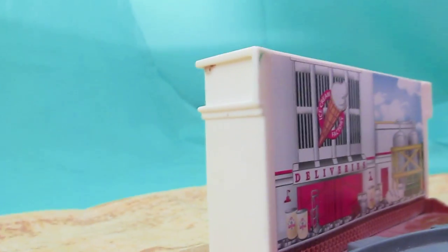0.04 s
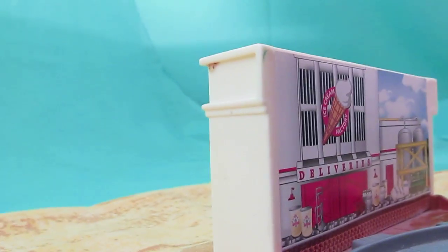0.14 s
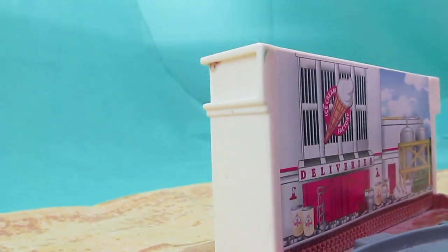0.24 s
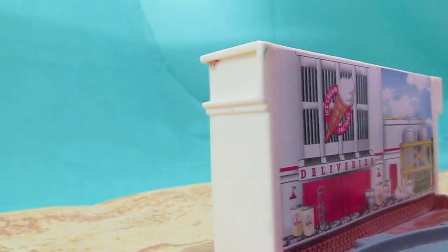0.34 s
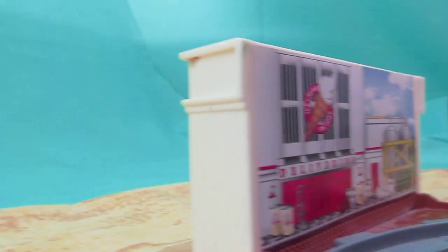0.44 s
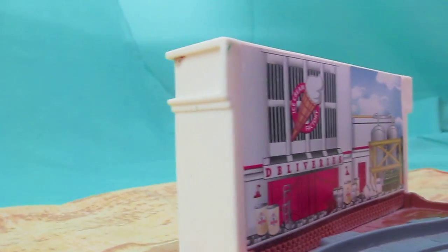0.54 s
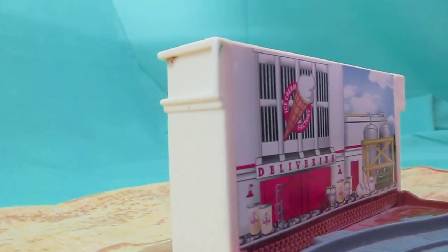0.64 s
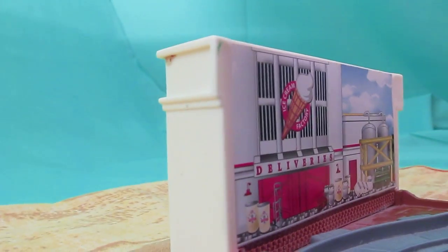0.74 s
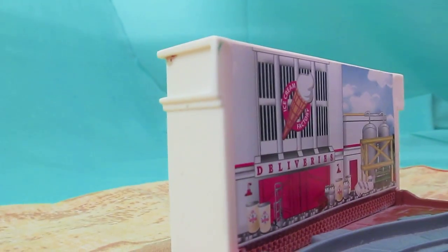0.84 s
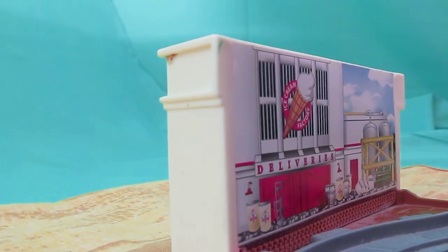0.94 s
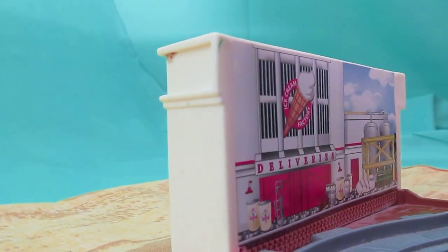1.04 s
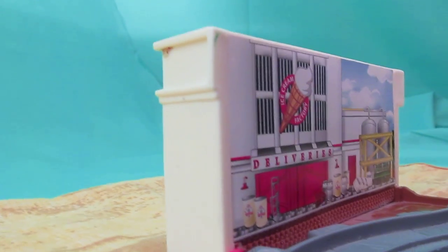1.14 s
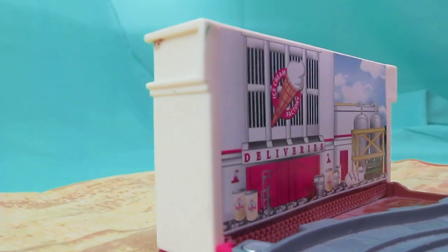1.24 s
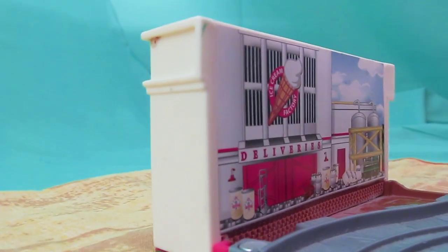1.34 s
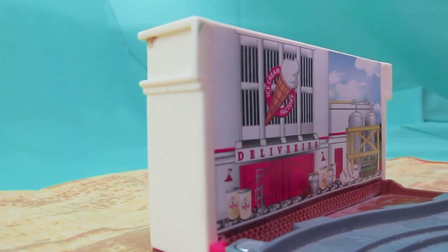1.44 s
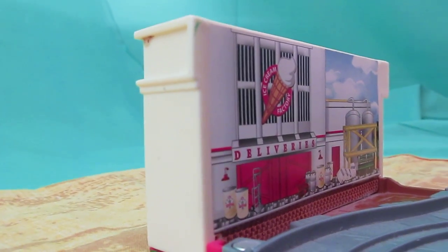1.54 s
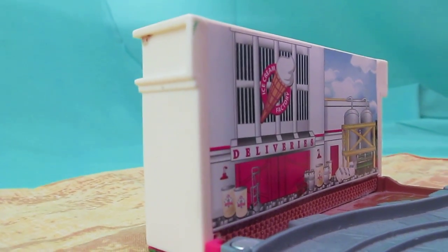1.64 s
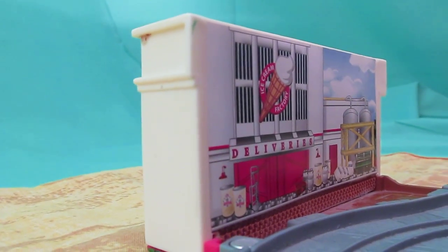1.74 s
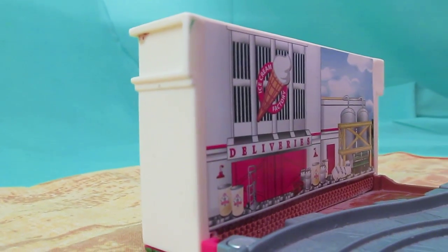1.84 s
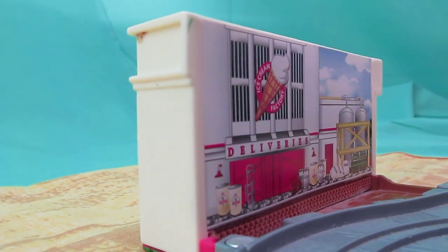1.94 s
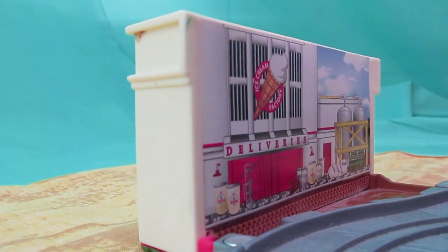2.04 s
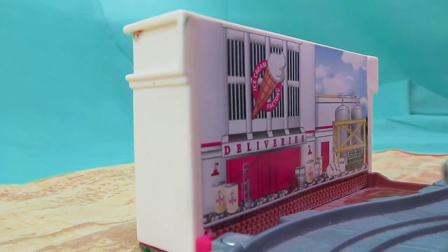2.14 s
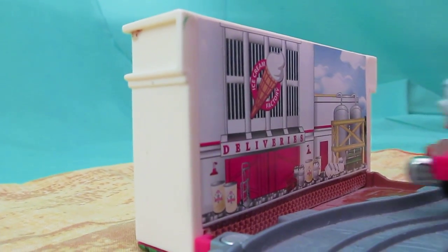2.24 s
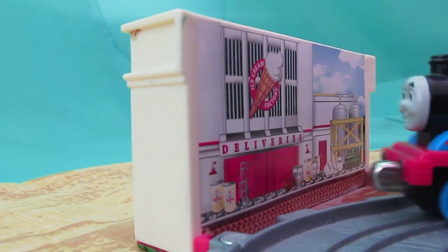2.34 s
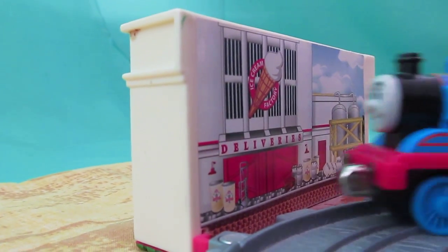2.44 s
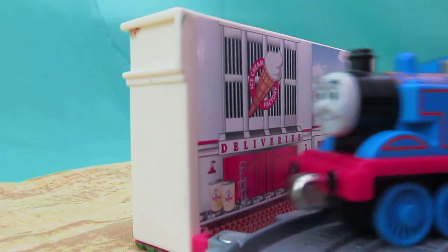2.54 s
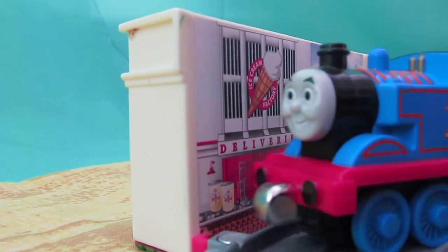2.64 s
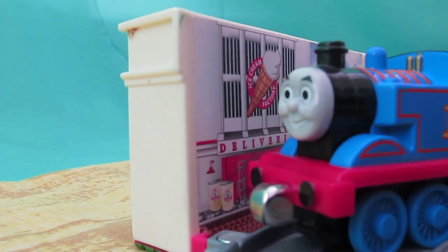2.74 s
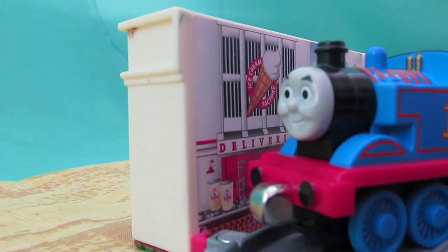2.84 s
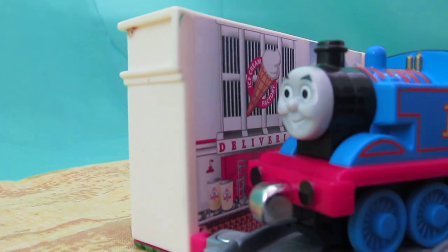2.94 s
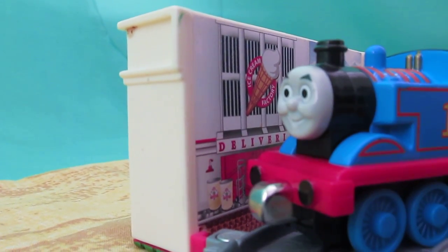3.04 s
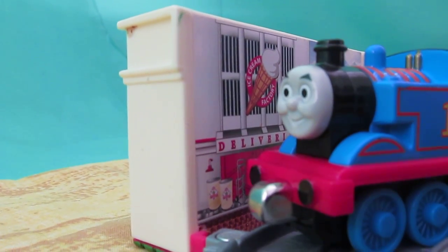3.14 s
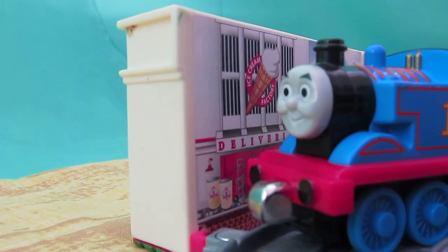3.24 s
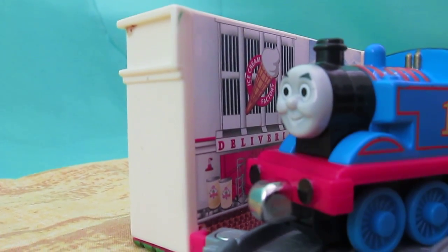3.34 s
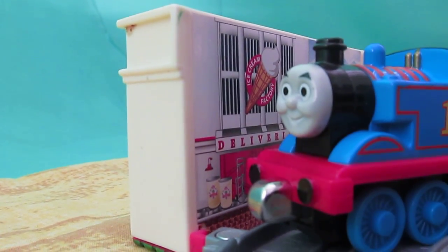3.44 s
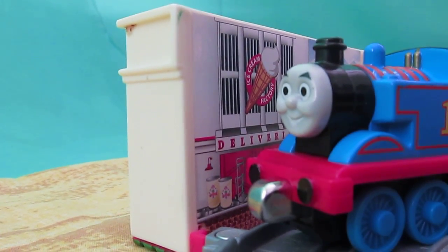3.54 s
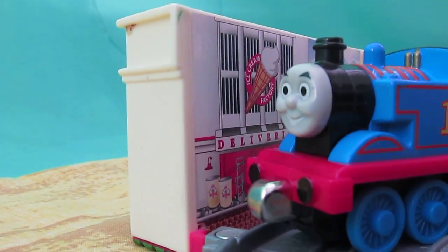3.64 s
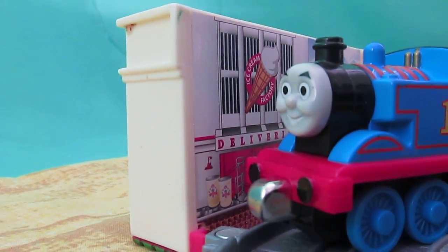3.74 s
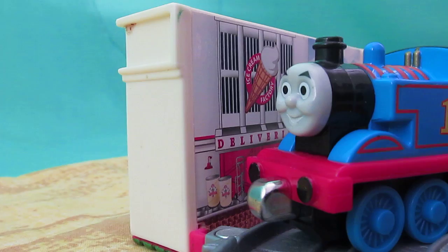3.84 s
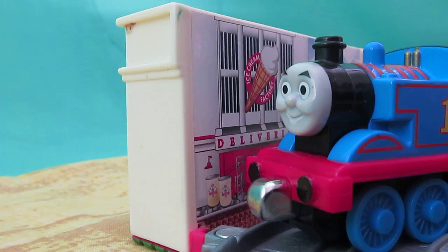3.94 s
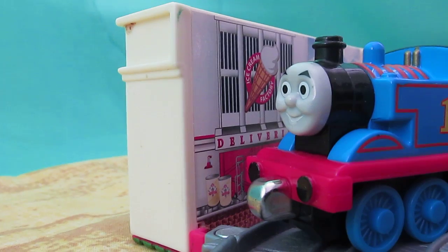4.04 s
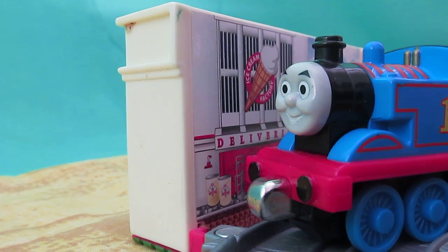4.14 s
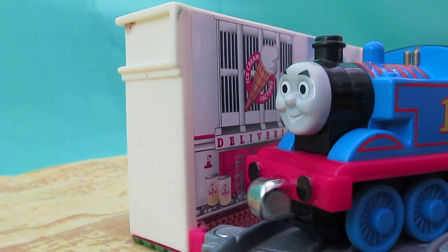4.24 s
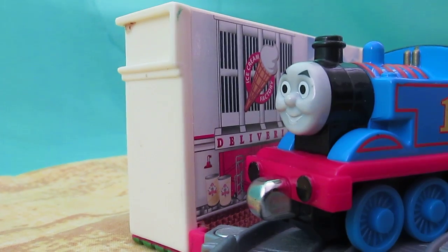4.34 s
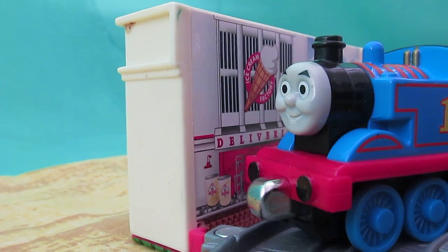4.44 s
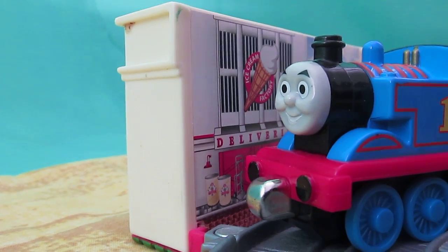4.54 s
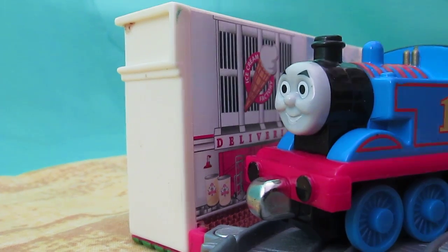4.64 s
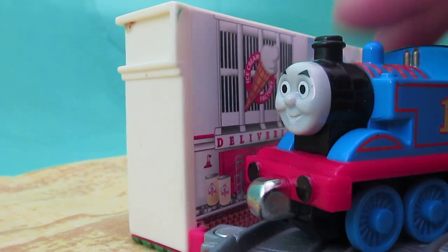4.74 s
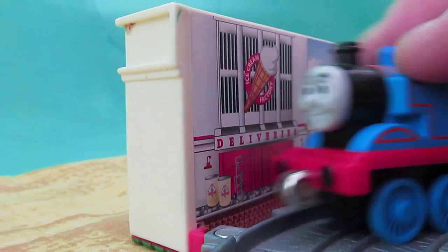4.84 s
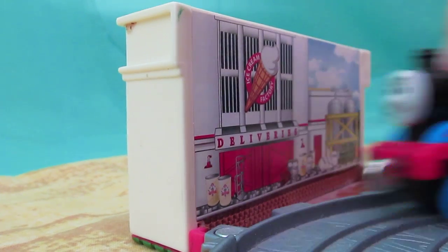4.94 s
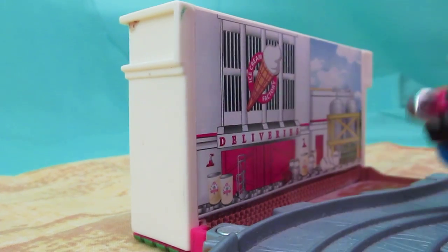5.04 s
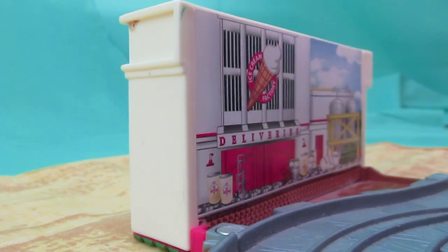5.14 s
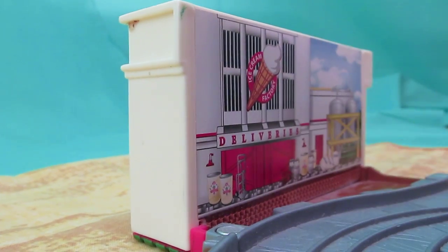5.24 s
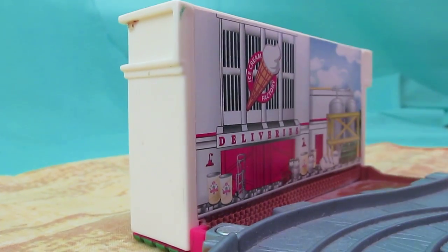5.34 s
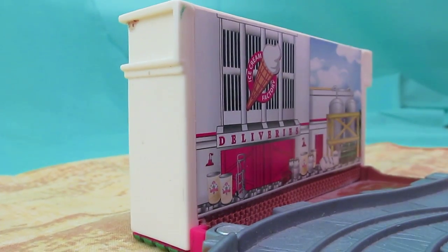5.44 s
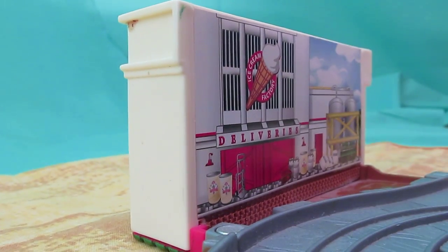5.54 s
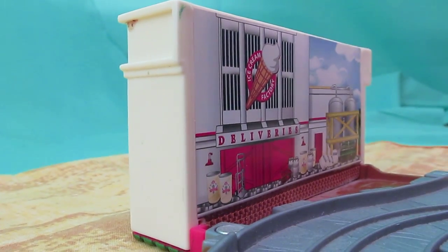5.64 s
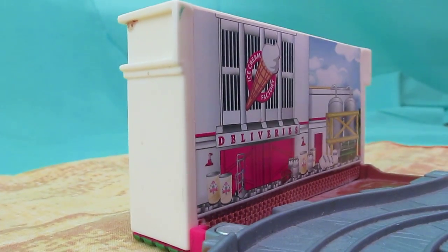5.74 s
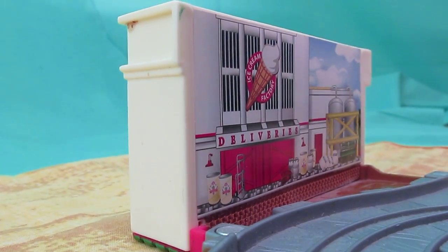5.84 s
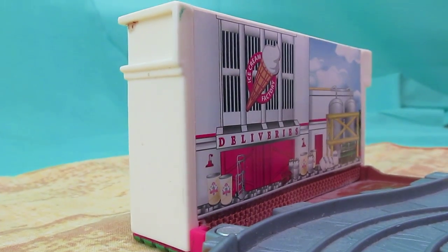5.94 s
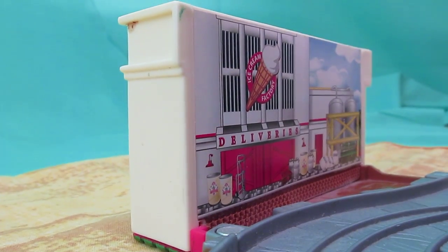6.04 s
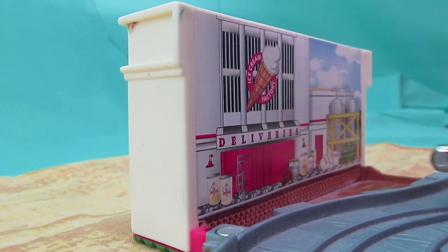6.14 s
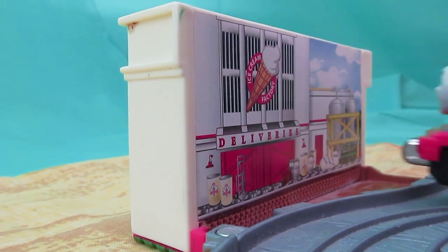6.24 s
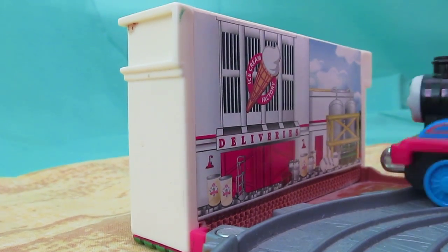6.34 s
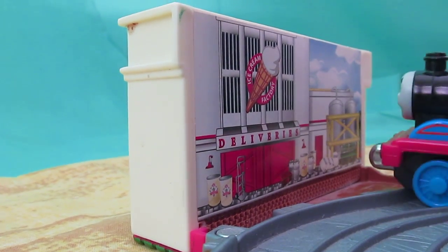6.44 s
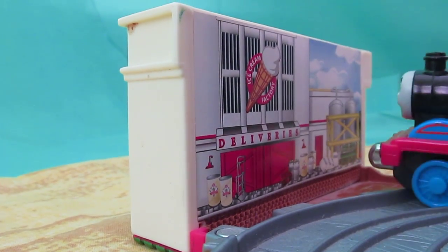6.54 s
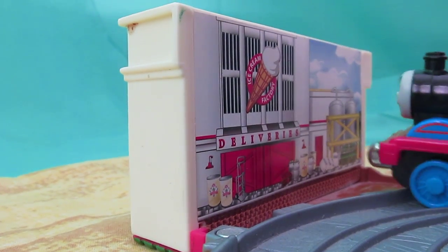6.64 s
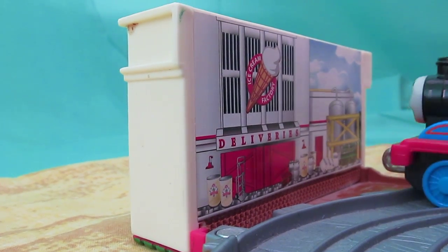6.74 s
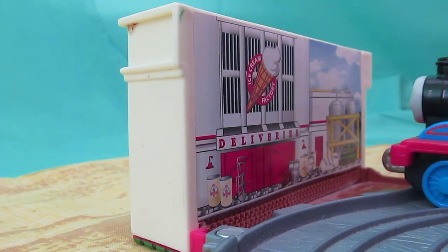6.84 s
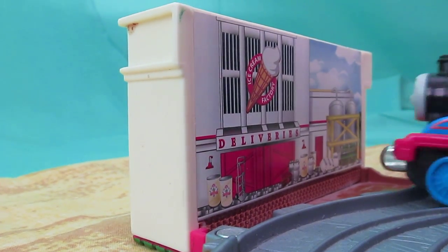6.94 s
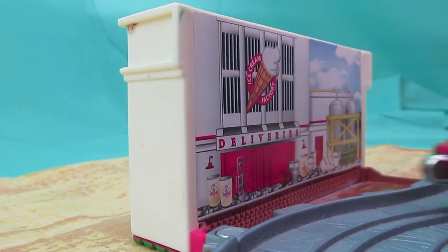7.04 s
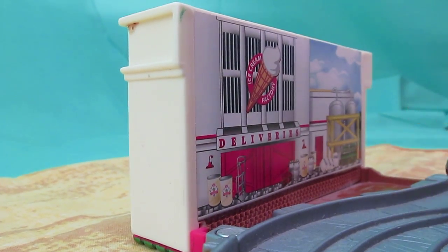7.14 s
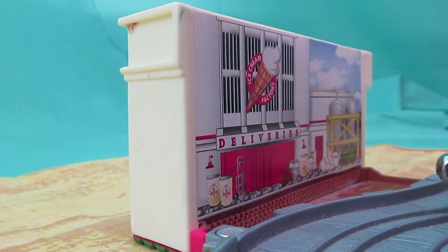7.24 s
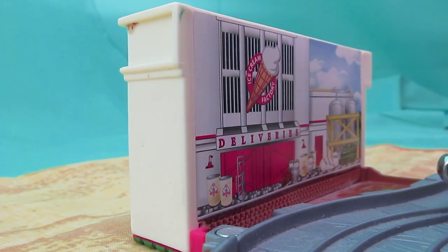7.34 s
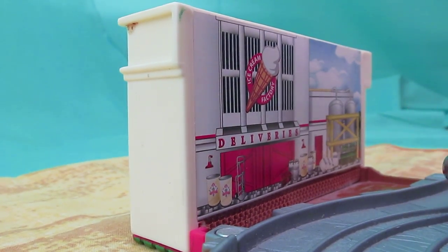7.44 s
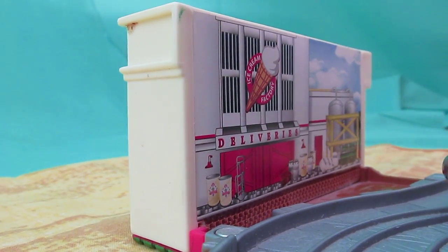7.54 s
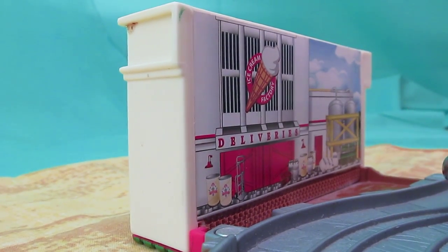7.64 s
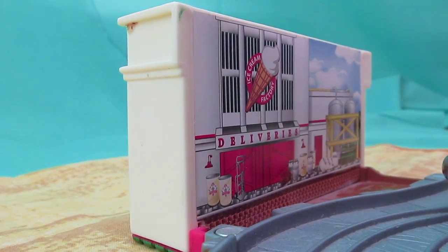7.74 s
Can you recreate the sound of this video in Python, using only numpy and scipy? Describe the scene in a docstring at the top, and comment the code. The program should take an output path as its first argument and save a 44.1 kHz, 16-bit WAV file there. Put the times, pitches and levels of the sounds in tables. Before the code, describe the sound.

Close plastic clicks and rattles come in spurts as a toy engine rolls back and forth by hand, with faint room hum.

```python
"""A small plastic toy engine, pushed to and fro by hand over a moulded track, indoors.
It runs close to a stereo microphone, a little right of centre. Wheels and couplings knock at the joints
and chatter while rolling; each contact rings the hollow plastic, and sharp snaps jingle the metal axles.
A soft breath-like rustle comes early, then faint rubs. The room gives a short, dull echo. Under it all
lie mains hum, a faint whine and air noise, which sink under the loudest knocks and creep back."""
import sys
import numpy as np
from scipy import signal
from scipy.fft import rfft, irfft
from scipy.io import wavfile

SR = 44100
rng = np.random.default_rng(int(sys.argv[2]) if len(sys.argv) > 2 else 0)


def bounce(signal):
    """Save signal as a 16-bit WAV file at the path given by the first command-line argument."""
    frames = np.transpose(np.atleast_2d(signal))
    limited = np.clip(frames, -1, 1)
    pcm = np.round(limited * 32767).astype(np.int16)
    wavfile.write(sys.argv[1], SR, pcm)


N = 343098

# modes of the hollow toy and track: (frequency [Hz], level [dB], t60 [s])
PLASTIC_MODES = [(80, -10, .06), (140, -3, .05), (230, -2, .03), (330, -3, .022), (420, -2, .02),
                 (560, -1, .018), (760, 1, .014), (1070, 3, .012), (1280, -1, .008), (1500, -2, .007),
                 (1940, 0, .007), (2330, 0, .006), (2700, 0, .006), (3150, 0, .006), (3550, -2, .005),
                 (4060, 0, .005), (4700, 0, .005), (5600, -2, .006), (6150, -3, .006), (6700, -2, .009),
                 (7500, -7, .004), (8800, -8, .0025), (10300, -7, .002), (11800, -11, .002),
                 (13600, -16, .0015)]
THUD_TOP_HZ, SNAP_FROM_HZ = 900, 5000   # modes below the first thud, modes above the second snap
TOY_PAN_DB, PAN_SCATTER_DB = -4, 4.5   # left minus right; each contact leaves from another spot


def from_db(db):
    """Gain of a level."""
    return 10 ** (np.asarray(db) / 20)


def in_time(rows):
    """The columns of a (time [s], values...) curve at every sample."""
    times, *columns = np.transpose(rows)
    return [np.interp(np.arange(N) / SR, times, column) for column in columns]


def at_hz(points, hz):
    """A (frequency [Hz], value) curve read on a log-frequency axis."""
    point_hz, values = np.transpose(points)
    return np.interp(np.log(hz), np.log(point_hz), values)


def sides(pan_db):
    """Left and right gain; a positive pan leans left."""
    return from_db(np.outer([.5, -.5], pan_db))


def drift(rate_hz):
    """A slow random wander with a spread of 1."""
    step, settle = 40, 2000
    pole = np.exp(-2 * np.pi * step * rate_hz / SR)
    noise = rng.standard_normal(N // step + settle + 2)
    slow = signal.lfilter([1], [1, -2 * pole, pole * pole], noise)[settle:]
    return np.interp(np.arange(N) / step, np.arange(len(slow)), slow / slow.std())


def air_noise(level_db=-56):
    """Air and microphone noise with a few peaks and dips; the lows are most alike on both sides."""
    # noise floor: (frequency [Hz], relative density [dB])
    floor = [(12, -41), (20, -20), (64, -4.5), (93, -7.5), (122, -3.5), (153, -16.5), (252, -11),
             (417, -19.5), (453, -18), (566, -20), (989, -24), (1780, -29.5), (1980, -30), (8940, -44),
             (15600, -59.5)]
    # low peaks, and a dip in the air noise around the 120 Hz hum: (frequency [Hz], width [Hz], gain [dB])
    peaks_and_dip = [(69, 31, 2), (87, 5.5, 6), (118.6, 24, -10), (232, 11, 1), (262, 4.9, 2),
                     (462.3, 12, 6)]
    # treble notches: (frequency [Hz], width [Hz], gain [dB])
    notches = [(5950, 150, -7), (7870, 90, -12)]
    # likeness of left and right: (frequency [Hz], correlation [0-1])
    likeness = [(60, 0.86), (150, 0.64), (380, 0.87), (950, 0.071), (2380, 0.29), (5980, 0.12),
                (15000, 0.051)]
    hz = np.fft.rfftfreq(N, 1 / SR) + 1e-3
    colour_db = sum(db / (1 + (2 * (hz - f) / width) ** 2) for f, width, db in peaks_and_dip + notches)
    shape = from_db(at_hz(floor, hz) + colour_db)
    shape /= np.sqrt(np.sum(shape[hz > 140] ** 2) / len(hz))   # unit power above 140 Hz
    alike = at_hz(likeness, hz)
    mid, side = rfft(rng.standard_normal((2, N)))
    stereo = np.sqrt(1 + alike) * mid + np.sqrt(1 - alike) * side * [[1], [-1]]
    return from_db(level_db) * irfft(shape * stereo, N)


def hum_and_whine():
    """Mains hum and a faint whine, just left of centre, each wavering slightly in level."""
    # the two sine tones: (frequency [Hz], level [dB])
    tones = [(120, -52.5), (3933.5, -83.5)]
    t = np.arange(N) / SR
    sines = sum(from_db(db + .7 * drift(3)) * np.sin(2 * np.pi * hz * t) for hz, db in tones)
    return np.sqrt(2) * sines * sides([1.1])


def room_tone():
    """Air, hum and whine together; their level dips around the loudest knocks and creeps back."""
    # rise and fall of the room tone: (time [s], level [dB])
    level_curve = [(0, 1), (1, 1), (2.3, 1), (2.7, 0), (3.2, 1), (4.8, 1.5), (5.0, -15), (5.2, -10),
                   (5.5, -9), (5.8, -9), (6.1, -3), (6.35, -6.5), (6.55, -4), (6.9, -2), (7.05, -9.5),
                   (7.3, -5), (7.78, -1.5)]
    return from_db(in_time(level_curve)[0]) * (air_noise() + hum_and_whine())


def strike(at, ring_db, pitch_hz, thud_db, thud_hz, snap_db, pan_db, scatter_db, focus_db_per_oct=16):
    """Contacts as clicks per mode and side: a ring near their pitch, a thud below it, a snap above."""
    luck = rng.standard_normal((len(at), len(PLASTIC_MODES), 4))   # sign, level, left and right phase
    clicks = np.zeros((len(PLASTIC_MODES), 2, N), np.float32)
    for k, (hz, mode_db, _) in enumerate(PLASTIC_MODES):
        near_db = ring_db - focus_db_per_oct * np.abs(np.log2(hz / pitch_hz))
        below_thud_oct = np.log2(thud_hz / hz)
        low_db = thud_db - 5.44 * np.abs(below_thud_oct) - 4.5 * np.maximum(below_thud_oct, 0)
        high_db = snap_db - 14 * np.log2(SNAP_FROM_HZ / hz)
        if hz < THUD_TOP_HZ:
            drive_db = low_db
        elif hz > SNAP_FROM_HZ:
            drive_db = snap_db
        else:
            drive_db = np.max([near_db, low_db, high_db], axis=0)
        size = np.sign(luck[:, k, 0]) * from_db(mode_db + drive_db + scatter_db * luck[:, k, 1])
        # short waves leave from scattered spots and deep thuds shake each microphone port on its own
        spread_rad = max(hz / 9000, 90 / hz)
        for port, gain in enumerate(sides(pan_db)):
            shift = np.round(luck[:, k, 2 + port] * spread_rad * SR / (2 * np.pi * hz)).astype(int)
            np.add.at(clicks[k, port], at + shift, size * gain)
    return clicks


def knocks(slips=8, skid_s=.009, skid_fade_db=16):
    """Single clear knocks of wheels, couplings and fingers, each with a fading skid of bright slips."""
    # (time [s], level [dB], ring pitch [Hz], relative thud [dB], thud pitch [Hz], relative snap [dB])
    contacts = [(0.2463, -36, 1960, -19, 248, -7), (0.673, -23.5, 1710, -8.5, 313, -17.5),
                (0.7599, -38, 1930, -14, 248, -25.5), (1.928, -39, 4000, -23, 250, -9.5),
                (2.1194, -37, 1601, -24, 202, -14), (2.1635, -37, 1790, -5, 202, -29),
                (2.171, -36, 1600, -6, 301, -33), (2.1924, -29.5, 1970, -21, 361, -36),
                (2.206, -28, 2150, -8.5, 245, -18), (2.2234, -39.5, 2300, -3, 202, -5),
                (2.2297, -31, 2510, -10, 320, -19), (2.2582, -17, 1980, -19, 304, -26.5),
                (2.2747, -10, 2020, -34, 202, -15.5), (2.2789, -6, 3350, -31, 226, -14.5),
                (2.2909, -18, 2670, -21, 202, -24), (2.3057, -16, 1990, -23, 307, -28),
                (2.3347, -21.5, 2810, -22, 579, -25), (2.3578, -20.5, 2620, -20, 296, -17),
                (2.3753, -25.5, 2470, -18, 350, -9.5), (2.4145, -20, 2070, -25, 665, -27),
                (2.4265, -15.5, 2550, -24, 668, -27), (2.4404, -19, 2169, -17, 369, -34),
                (2.4722, -19.5, 1870, -18, 288, -16.5), (2.5042, -24, 2500, -21, 202, -29),
                (2.5254, -17, 2670, -19, 546, -25), (2.5322, -15, 2800, -15, 202, -32),
                (2.5389, -16.5, 2060, -6.5, 241, -11.5), (2.55, -8.5, 2530, -31, 310, -24),
                (2.579, -19, 2830, -22, 242, -31), (2.5831, -17.5, 2500, -19, 245, -16.5),
                (2.5984, -25, 2860, -17, 223, -33), (2.656, -39, 1760, -7, 202, -18),
                (3.682, -39, 2000, -11, 223, -20), (4.7564, -19.5, 2550, -13.5, 202, -15.5),
                (4.795, -14, 3120, -17, 230, -40), (4.816, -23, 2520, -13, 207, -26),
                (4.828, -20.5, 2360, -15.5, 202, -31), (4.8504, -20, 2549, -9, 205, -35),
                (4.8589, -17, 2310, -18, 240, -27), (4.8728, -4.5, 2680, -25, 285, -19),
                (4.8835, -14.5, 2420, -11.5, 620, -23), (4.898, -12, 2540, -17, 202, -28),
                (4.9124, -16, 2950, -15, 283, -18), (4.9234, -9, 2270, -23, 651, -24),
                (4.9271, 0.5, 3274, -31, 503, -23.5), (4.9378, -12, 2966, -28, 620, -23),
                (4.9454, -19, 2650, -28, 360, -19), (4.97, -17, 2550, -20, 404, -15),
                (4.9907, -5.5, 2700, -21, 698.6, -20.5), (5.0048, -25.5, 3910, -17, 382.6, 0),
                (5.0744, -23, 2050, -10.5, 250, -7.5), (5.0787, -17, 2474, -16.5, 291, -6),
                (5.0921, -19.5, 2200, -18, 388, -5.5), (5.1251, -15, 3320, -17, 202, -8),
                (5.1256, -8, 2230, -22, 363, -11), (5.1351, -6, 2140, -24, 514, -5),
                (5.1484, -14, 3130, -25, 541, -16), (5.228, -38.5, 1770, -13, 377, -29),
                (5.2454, -26, 1990, -21, 474, -37), (5.4103, -28.5, 2560, -23, 318, -30),
                (5.4134, -33, 1690, -20, 237, -27.5), (5.436, -46, 1670, -8, 301, -29),
                (5.8436, -44, 1568, -7, 210.6, -30), (5.9891, -43, 1564, -5.5, 323, -10),
                (6.0752, -33, 1899, -10.5, 299, -26), (6.1143, -15, 2820, -18, 524, -25),
                (6.125, -9, 2960, -22, 493, -19), (6.2215, -16, 1973, -27, 361.3, -23),
                (6.2281, -11, 2120, -28, 242, -29), (6.2348, -12, 2830, -17.5, 336, -23.5),
                (6.2744, -17.5, 1980, -18.5, 291, -26), (6.2908, -15.5, 2260, -25, 304, -30),
                (6.3135, -7.5, 2430, -30.5, 320, -31), (6.3163, -3.5, 2660, -45, 374, -24),
                (6.3234, -12.5, 2750, -13, 388, -15), (6.3324, -19, 2250, -16, 369, -16),
                (6.3746, -15, 1960, -20, 530, -20), (6.3884, -15.5, 1850, -19, 370, -16),
                (6.4013, -11.5, 2000, -24.5, 202, -17.5), (6.4257, -18, 1690, -24.5, 700, -29),
                (6.4311, -15.5, 2720, -28, 516, -32), (6.4427, -26.5, 2348, -17, 229, -24),
                (6.6754, -25, 2620, -18, 345, -39), (6.6885, -17, 2400, -23.5, 484, -29.5),
                (6.6923, -8, 2350, -25, 646, -21.5), (6.7234, -20, 2920, -18, 476, -30),
                (6.7388, -15, 2050, -22, 546, -24), (6.7434, -19, 2100, -13, 374, -11.5),
                (6.8754, -22, 2267, -16.5, 377, -32), (6.9208, -20, 1959, -13, 253, -29),
                (6.9298, -17.5, 2340, -28, 342, -25.5), (6.9437, -27, 2180, -17, 396, -29),
                (6.968, -34, 2200, -16, 358, -16), (6.9841, -21, 2370, -9.5, 474, -12.5),
                (7.0, -10, 1980, -22, 568, -20), (7.011, -11, 1920, -25, 221, -28),
                (7.0156, -5.5, 2750, -34, 213, -19), (7.0225, -3.5, 2920, -34, 468, -22),
                (7.042, -18.5, 2780, -28, 256, -20), (7.0903, -33.5, 1550, -20, 215, -18),
                (7.0974, -25.5, 1560, -20.5, 310, -14.5), (7.1986, -49, 1698, 3, 318, -25),
                (7.231, -35.5, 1680, -13, 595, -31), (7.2517, -14.5, 1652, -23.5, 466, -31),
                (7.2556, -24, 1940, -13.5, 245, -22), (7.2962, -40, 1570, -4.5, 312, -35.5),
                (7.4262, -34, 1630, -22, 503, -38), (7.661, -35, 1980, -12.5, 306.7, -32.5)]
    times, level_db, pitch_hz, thud_db, thud_hz, snap_db = np.transpose(contacts)
    luck = rng.random((len(times), slips + 1))
    pan_db = TOY_PAN_DB + PAN_SCATTER_DB * (2 * luck[:, 0] - 1)
    hits = strike((times * SR).astype(int), level_db - 5.5, pitch_hz, level_db + thud_db + .5, thud_hz,
                  level_db + snap_db - 7.5, pan_db, scatter_db=3)
    into_skid = luck[:, 1:]
    slip_at = ((times[:, None] + skid_s * into_skid) * SR).astype(int).ravel()
    slip_db = ((level_db + snap_db - 1.5)[:, None] - skid_fade_db * into_skid).ravel()
    mute_db, any_hz = np.full(len(slip_at), -200), np.full(len(slip_at), 1000)   # slips are all snap
    skids = strike(slip_at, mute_db, any_hz, mute_db, any_hz, slip_db, np.repeat(pan_db, slips),
                   scatter_db=6, focus_db_per_oct=0)
    return hits + skids


def ring(clicks, hz, t60, contact_cycles=7):
    """A soft contact swells a mode over a few cycles, then it dies; a unit click peaks at 1."""
    angle = 2 * np.pi * hz / SR
    poles = from_db(-60 / (np.array([t60, contact_cycles / hz]) * SR))
    sos = [[1, 0, -1, 1, -2 * r * np.cos(angle), r * r] for r in poles]
    peak = np.abs(signal.sosfilt(sos, np.arange(2000) == 0)).max()
    return signal.sosfilt(sos, clicks + 1e-18) / peak


def plastic_body(clicks):
    """The hollow toy and track ring briefly at every contact."""
    return sum(ring(train, hz, t60) for train, (hz, _, t60) in zip(clicks, PLASTIC_MODES))


def metal_jingle(clicks):
    """The metal axles and coupling jingle on every snap."""
    # modes of the metal parts: (frequency [Hz], level [dB], t60 [s])
    metal_modes = [(5800, -12.5, .06), (6320, -11.5, 0.057), (6460, -12.5, 0.047), (6855, -13, 0.046),
                   (13100, -18, .05)]
    snaps = clicks[np.array(PLASTIC_MODES)[:, 0] > SNAP_FROM_HZ]
    return sum(from_db(db) * ring(train, hz, t60) for train, (hz, db, t60) in zip(snaps, metal_modes))


def room_echo(sound, level_db=-19, t60_s=.14, first_wall_s=.008, wall_cut_hz=3600):
    """Dense, dull reflections that build up as the sound reaches the first wall and soon die away."""
    t = np.arange(SR // 3) / SR
    build_up = np.clip(t / first_wall_s, 0, 1) ** 3
    tail = rng.standard_normal((2, len(t))) * from_db(-60 * t / t60_s) * build_up
    tail = signal.sosfilt(signal.butter(1, wall_cut_hz, fs=SR, output="sos"), tail)
    tail /= np.sqrt(np.sum(tail ** 2) / 2)
    return from_db(level_db) * signal.oaconvolve(sound.mean(0, keepdims=True), tail)[:, :N]


def motion(swell_fade_db=17.5):
    """Chatter, rumble and scrape levels and rumble pitch through the rustle, the rubs and the pushes."""
    # a soft breath-like rustle, then faint rubs; each swells and fades:
    # (middle [s], length [s], chatter [dB], rumble [dB], scrape [dB], rumble pitch [Hz])
    swells = [(.46, 0.26, -69, -53, -67.5, 537), (1.044, 0.083, -60, -60, -63, 180),
              (3.999, 0.098, -63.5, -53.5, -60.5, 190), (4.48, .12, -67, -63, -69, 250.3),
              (4.622, 0.21, -63.5, -60, -74, 180.3)]
    # one curve for each push of the toy: (time [s], chatter [dB], rumble [dB], scrape [dB])
    pushes = [
        [(2.10, -66, -64, -75), (2.175, -61, -39.5, -75), (2.265, -54, -38.5, -66), (2.28, -29.5, -33, -38),
         (2.35, -40.5, -36.5, -51), (2.40, -51, -47, -55), (2.434, -40, -35, -51), (2.51, -39, -32.5, -53),
         (2.545, -26.5, -31.5, -40.5), (2.63, -45, -37, -57.5), (2.74, -77, -69, -82)],
        [(4.72, -67, -62, -69), (4.77, -60, -46, -64), (4.80, -53, -34.5, -62), (4.862, -27.5, -30, -45.5),
         (4.932, -26, -34, -36), (4.996, -45.5, -36, -34.5), (5.04, -57, -48.5, -48), (5.132, -28.5, -32, -31),
         (5.21, -63.5, -61, -57.5), (5.36, -69.5, -65, -80)],
        [(5.82, -72, -56, -90), (5.95, -75, -67, -90), (6.06, -56.5, -47, -82), (6.122, -57, -37.5, -59),
         (6.19, -54, -54, -71), (6.242, -49, -48.5, -43), (6.29, -53, -47, -72), (6.334, -41.5, -31, -43),
         (6.398, -32, -37, -35), (6.458, -58, -57, -64), (6.52, -65, -73.5, -74.5)],
        [(6.60, -68, -59, -90), (6.68, -66.5, -57, -77), (6.70, -45.5, -40, -69), (6.75, -45.5, -44.5, -56),
         (6.84, -70, -64, -76)],
        [(6.87, -64, -56, -73), (6.94, -54.5, -45, -63), (6.99, -37, -44, -61), (7.01, -26, -35, -39),
         (7.04, -35.5, -41.5, -50), (7.2, -71, -63, -88), (7.256, -53, -55.5, -61), (7.36, -68, -55.5, -82)],
    ]
    still_db, rows = (-95, -95, -95), []
    for push in pushes:
        rows += [(push[0][0] - .01, *still_db), *push, (push[-1][0] + .025, *still_db)]
    levels, t = np.array(in_time(rows)), np.arange(N) / SR
    rumble_hz = 214 * 2 ** (-.1 * (levels[1] + 59.5))   # an octave deeper for every 10 dB louder
    for middle, length, *top_db, hz in swells:
        away = np.abs(2 * (t - middle) / length)
        inside = away < 1
        levels[:, inside] = np.array(top_db)[:, None] - swell_fade_db * away[inside] ** 2
        rumble_hz[inside] = hz
    return (*levels, rumble_hz)


def rustle_and_rolling(grazes_per_s=4000, ticks_per_s=130):
    """Clumps of tiny grazes make the rustle, the rubs and the axle chatter; wheels tick on the track."""
    chatter_db, rumble_db, scrape_db, rumble_hz = motion()
    moving = chatter_db + rumble_db > -185
    chance, force, detune = rng.random(N), rng.exponential(1, N), rng.standard_normal(N)
    pan_db = TOY_PAN_DB + PAN_SCATTER_DB * rng.standard_normal(N)

    at = np.flatnonzero((chance < grazes_per_s / SR) & moving)
    clump_db = 2.3 * drift(27.2)[at]
    graze_db = clump_db + 2 * np.minimum(force[at], 3.5)
    graze_hz = 2500 * 2 ** (.3 * detune[at])
    grazes = strike(at, chatter_db[at] + graze_db - 13, graze_hz,
                    rumble_db[at] + .19 * graze_db - 18, rumble_hz[at],
                    scrape_db[at] + graze_db - 13.5, pan_db[at] - 4, scatter_db=2.5, focus_db_per_oct=12)

    at = np.flatnonzero((chance > 1 - ticks_per_s / SR) & moving)
    tick_db = 4 + 3.85 * np.minimum(force[at], 2.5)
    tick_hz = 2500 * 2 ** (.012 * (chatter_db[at] + 26.5) + .15 * detune[at])   # light ticks ring lower
    ticks = strike(at, chatter_db[at] + tick_db, tick_hz, rumble_db[at] + tick_db - 9, rumble_hz[at],
                   scrape_db[at] + tick_db - 6, pan_db[at], scatter_db=2)
    return grazes + ticks


def at_microphone(toy):
    """The toy stands to the right, so its sound reaches the left port a little later."""
    # lag of the left port as the toy moves: (time [s], delay [samples])
    left_lag = [(0, 2), (2.0, 2.5), (4.9, 3), (5.05, 4), (7.78, 4)]
    samples = np.arange(N)
    left = np.interp(samples - in_time(left_lag)[0], samples, toy[0])
    return np.array([left, toy[1]])


def scene():
    """The toy close to the microphone, with its echo and the room tone behind it."""
    clicks = knocks() + rustle_and_rolling()
    toy = at_microphone(plastic_body(clicks) + metal_jingle(clicks))
    return toy + room_echo(toy) + room_tone()


def record(dry, cutoff_hz=15800):
    """The recorder clips at full scale and cuts the top treble steeply."""
    low_pass = signal.ellip(12, .5, 80, cutoff_hz, fs=SR, output="sos")
    return signal.sosfilt(low_pass, np.clip(dry, -1, 1))


dry = scene()
out = record(dry)
bounce(out)
```